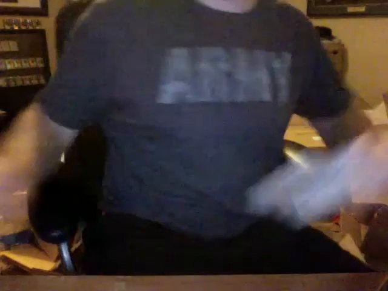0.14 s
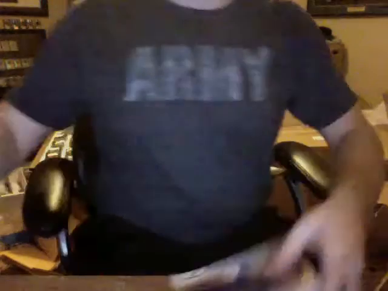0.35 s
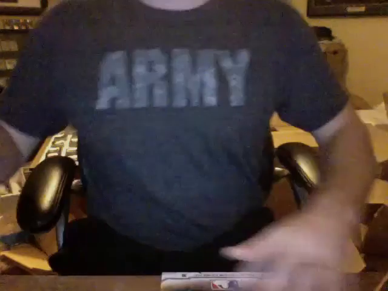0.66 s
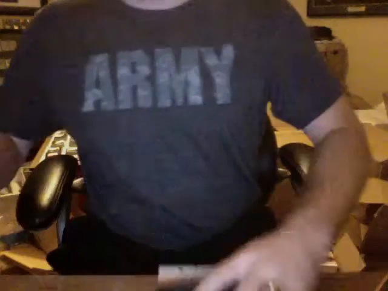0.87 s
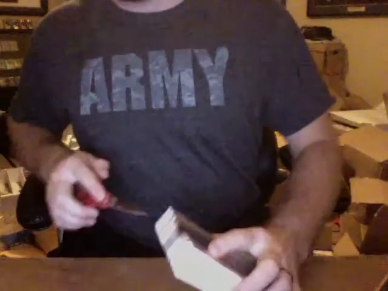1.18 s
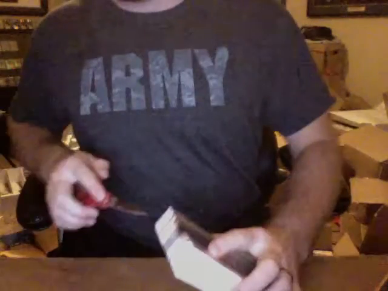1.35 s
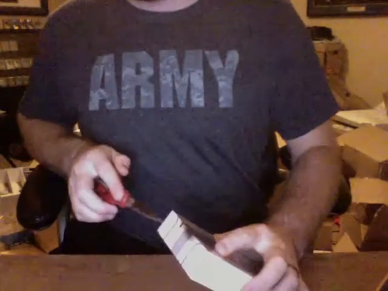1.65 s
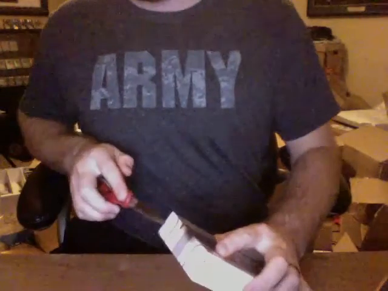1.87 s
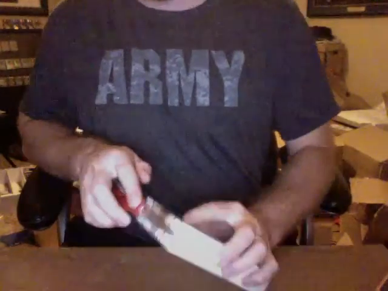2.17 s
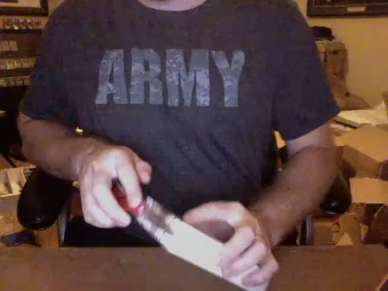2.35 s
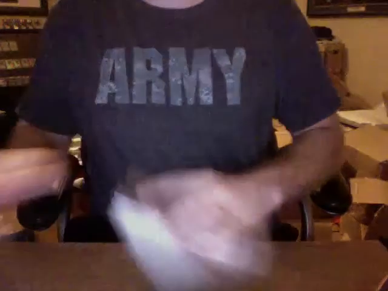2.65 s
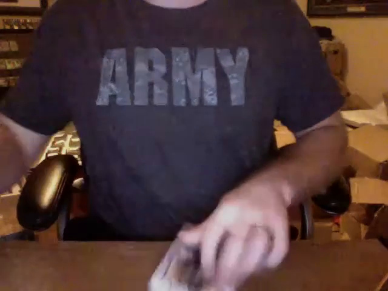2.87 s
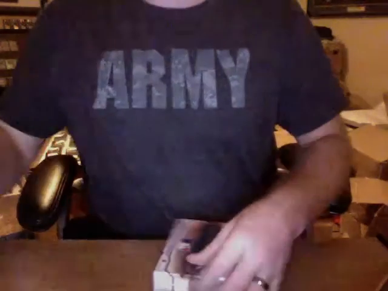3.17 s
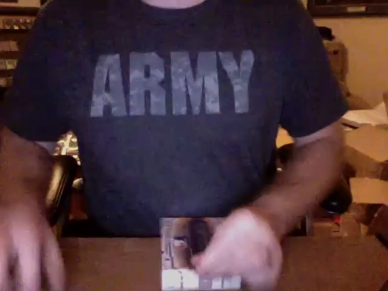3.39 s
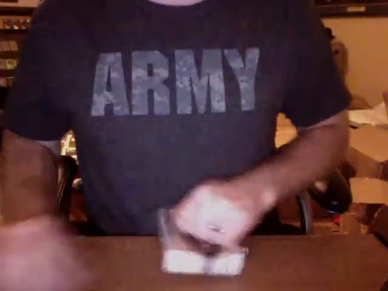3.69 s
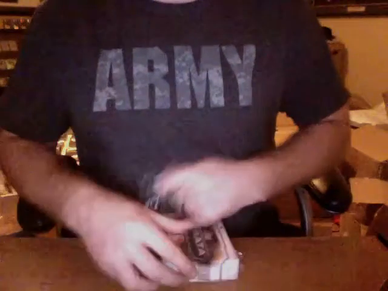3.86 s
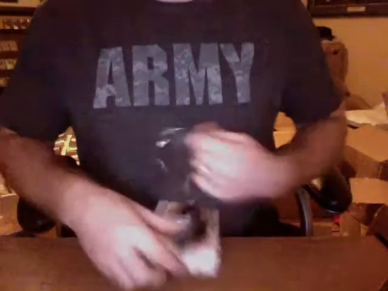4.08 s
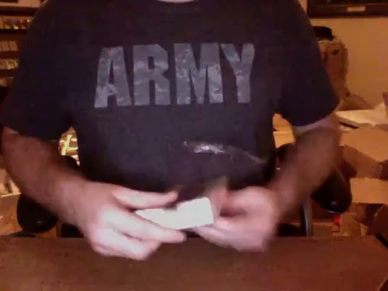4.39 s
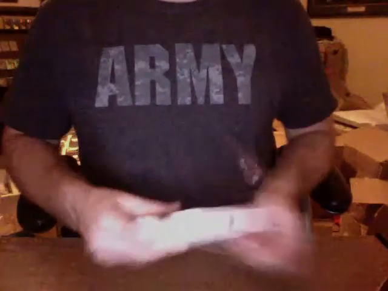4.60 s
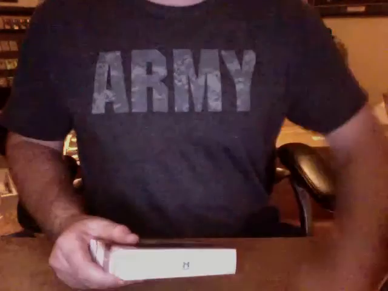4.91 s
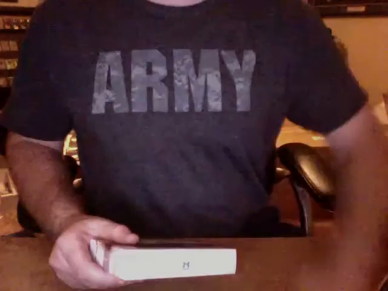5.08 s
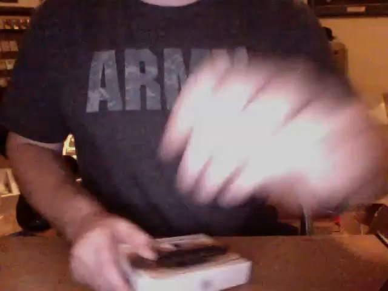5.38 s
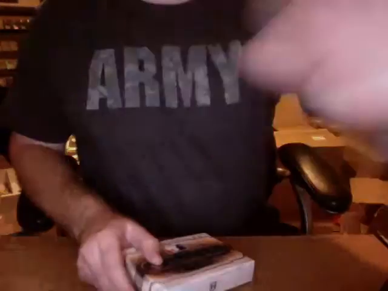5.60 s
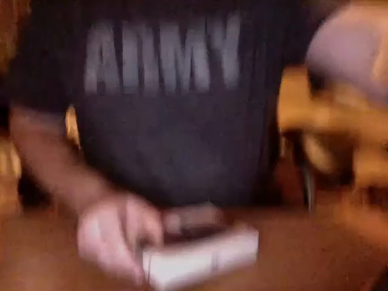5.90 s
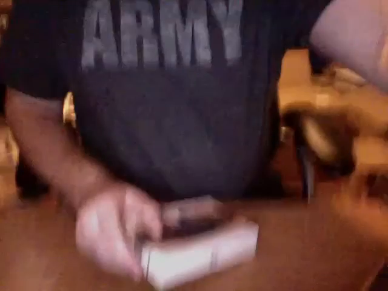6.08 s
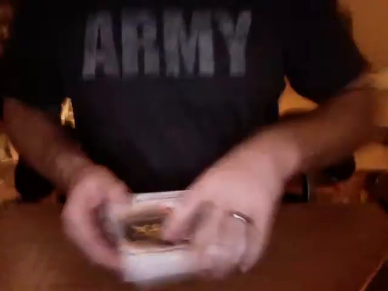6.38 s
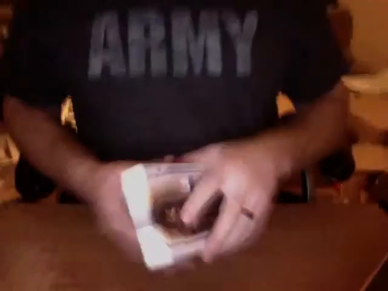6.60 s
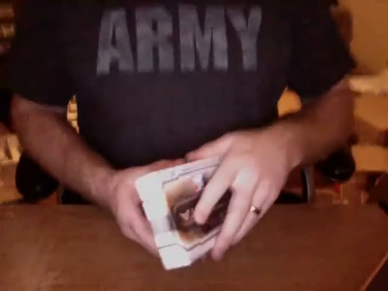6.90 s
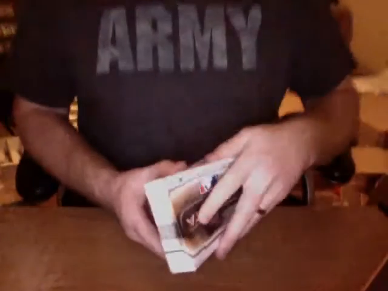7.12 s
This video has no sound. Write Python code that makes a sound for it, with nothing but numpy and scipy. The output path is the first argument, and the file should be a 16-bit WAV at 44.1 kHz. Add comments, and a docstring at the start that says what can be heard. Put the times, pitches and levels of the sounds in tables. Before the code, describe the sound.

A soft computer fan runs throughout. A hollow cardboard clack opens, followed by faint desk bumps and a pause. Around two seconds, film is cut and torn in loud crisp cracks with scraping box, then boxy knocks and another snap. Quieter crinkles and airy ticks follow, then light taps, a click, and a little handling. Dry close sound, short room tail, little deep bass.

```python
"""A small cluttered room, at a desk: a boxed pack is put down, slit with a knife and stripped of its plastic film.
Close to the microphone a computer fan hums: shaped noise and two wavering tones.
On the desk, hands shuffle the box (grains through ringing modes) and the film crinkles and snaps (filtered noise).
Knocks ring the card box and the desk top as dying sines; the room answers with a short tail of sparse taps.
The small microphone loses the deep bass and squeezes the peaks."""
import sys
import numpy as np
from scipy import signal
from scipy.io import wavfile
from scipy.ndimage import uniform_filter1d

SR = 44100
rng = np.random.default_rng(int(sys.argv[2]) if len(sys.argv) > 2 else 0)


def wav_record(signal):
    """Record a signal, one row per channel, as 16-bit PCM in the file named by sys.argv[1]."""
    frames = np.transpose(np.atleast_2d(signal))
    bounded = np.clip(frames, -1, 1)
    # unit amplitude maps onto the largest positive 16-bit level
    quanta = np.round(bounded * 32767).astype(np.int16)
    wavfile.write(sys.argv[1], SR, quanta)


N = 319725


def amp(db):
    """Turns dB into a gain."""
    return 10 ** (np.asarray(db) / 20)


def evened(x):
    """Scales to rms 1."""
    return x / np.sqrt(np.mean(x ** 2) + 1e-20)


def smoothed(x, size):
    """Averages the rows over size[0] steps and the columns over size[1]."""
    return uniform_filter1d(uniform_filter1d(x, size=size[0], axis=0), size=size[1], axis=1)


def read(points, hz):
    """Reads a spectrum on a log-frequency axis."""
    f, value = np.transpose(points)
    return np.interp(np.log(hz + 1), np.log(f + 1), value)


def add(mix, s, sound):
    """Mixes a sound in at s seconds."""
    part = mix[round(s * SR):][:len(sound)]
    part += sound[:len(part)]


def colour(x, points):
    """Filters causally (minimum phase) with the given spectrum, filter energy 1."""
    level_db = np.maximum(read(points, abs(np.fft.fftfreq(1024, 1 / SR))), -80)
    log_gain = np.log(amp(level_db))
    phase = -signal.hilbert(log_gain).imag
    taps = np.fft.ifft(np.exp(log_gain + 1j * phase)).real[:512]
    return signal.oaconvolve(x, taps / np.linalg.norm(taps))[:len(x)]


def rings(modes, weight, contact_s):
    """Dying sines of a struck body, peak 1; a long soft contact makes them swell in."""
    t = np.arange(SR // 4) / SR
    out = np.zeros(len(t))
    for w, (hz, db, t60) in zip(weight, modes):
        out += w * amp(db - 60 * t / t60) * np.sin(2 * np.pi * hz * t)
    out *= np.sin(np.pi / 2 * np.minimum(t / max(contact_s, 1 / SR), 1)) ** 2
    return out / abs(out).max()


def grains(per_s, spread_db):
    """Sparse clicks of random sign, many small and a few large, rms 1."""
    size = amp(spread_db * np.minimum(rng.exponential(1, N), 4)) * rng.choice([-1., 1.], N)
    return evened(size * (rng.random(N) < per_s / SR))


def clumped(x, patchy_db, size):
    """Random patches come forward or fall back as creases bunch up; size = (steps of 172 Hz, steps of 1.5 ms)."""
    _, _, z = signal.stft(x, nperseg=256, noverlap=192)
    patches = evened(smoothed(rng.standard_normal(z.shape), size))
    return evened(signal.istft(z * amp(patchy_db * patches), nperseg=256, noverlap=192)[1][:N])


RISE_DB, FALL_DB = 23.5, 35.5  # dB gained in the rise time and lost in the fall time
ROUND = 1.385  # over 1 rounds the top
LINGER_DB, LINGER = -34, 7.3  # a faint remainder, and how many times slower it falls


def swells(rows, above_db, fall_share):
    """Each row rises to its peak and dies away; returns their summed gain and which row is loudest."""
    peak, rise, fall, db = np.transpose(rows)[:4, :, None]
    t = np.arange(0, N / SR + .01, .001)
    before = np.maximum(peak - t, 0) / np.maximum(rise, .002)
    after = np.maximum(t - peak, 0) / np.maximum(fall * fall_share, .003)
    rising_db = db + np.reshape(above_db, (-1, 1)) - RISE_DB * before ** ROUND
    dying = amp(-FALL_DB * after ** ROUND) + amp(LINGER_DB - FALL_DB * after / LINGER)
    each = amp(rising_db) * dying
    now = np.arange(N) / SR
    gain = np.interp(now, t, np.linalg.norm(each, axis=0))  # the rows add as power
    return gain, each.argmax(axis=0)[(now * 1000).astype(int)]


# how fast the room's echoes die: [f/Hz, t60/s]
ROOM_DECAY = [(100, 0.044), (300, 0.26), (1000, 0.16), (3000, 0.069), (7000, 0.13), (14000, 0.18)]


def room(x):
    """Sparse taps of random sign, one in every 20 samples, each band dying at its own speed."""
    taps, slots = np.zeros(SR // 2), np.arange(200, SR // 2 - 20, 20)
    taps[slots + rng.integers(0, 20, len(slots))] = rng.choice([-1., 1.], len(slots))
    hz, t, z = signal.stft(taps, SR, nperseg=256)
    decay = amp(-60 * t / read(ROOM_DECAY, hz)[:, None])
    tail = signal.istft(z * decay, SR, nperseg=256)[1]
    return signal.fftconvolve(x, tail / np.linalg.norm(tail))[:N]


# spectrum of the fan's rushing air, relative: [f/Hz, level/dB per Hz]
FAN_AIR = [(24, -85.5), (40, -53), (124, -16.5), (297, -14.5), (354, -10), (444, -13), (942, -11),
           (1020, -10.5), (1210, -12), (1760, -13), (1900, -16.5), (3140, -13), (4240, -23), (5870, -25.5),
           (16000, -55.5)]
# thin tones of the fan, before the drift below: [f/Hz, level/dB]
FAN_TONES = [(355, -73), (1141, -72.5)]
# the whole hum drifts and dips briefly: [t/s, level/dB]
FAN_DRIFT = [(0, 1.5), (1.0, 2), (1.3, -2.5), (1.58, -3), (1.62, -1.5), (2.5, 5.5), (5.4, 1.5), (6.2, -1),
             (7.25, 5)]


def fan():
    """Rushing air with drifting patches, and two thin wavering tones, close to the microphone."""
    frames, hz = N // 512 + 5, np.fft.rfftfreq(2048, 1 / SR)
    real, imaginary, patches = rng.standard_normal((frames, 1025, 3)).T
    patches = evened(smoothed(patches, (20, 8)))
    z = (real + 1j * imaginary) * amp(read(FAN_AIR, hz)[:, None] + 0.8 * patches)
    air = evened(signal.istft(z, nperseg=2048, noverlap=1536)[1][:N])
    hum = amp(-59.5) * air
    for f, db in FAN_TONES:
        waver = uniform_filter1d(rng.standard_normal(N), size=4000)
        waver = evened(uniform_filter1d(waver, size=4000))
        phase = 2 * np.pi * np.cumsum(f + 1.1 * waver) / SR
        hum += np.sqrt(2) * amp(db + 1.3 * waver) * np.sin(phase)
    return hum * amp(np.interp(np.arange(N) / SR, *np.transpose(FAN_DRIFT)))


# ringing modes of the card box: [f/Hz, level/dB, t60/s]
BOX_MODES = [(282, -8.5, 0.02), (344.6, -7, 0.13), (399.4, 1, 0.037), (547, 2.5, 0.033), (588, -2.5, 0.073),
             (712, 1.5, 0.041), (798.5, 1, 0.043), (872, 2.5, 0.032), (1074, 4, 0.024), (1177, -13.5, 0.11),
             (1304, 2, 0.044), (1592, 1, 0.026), (2020, -14, 0.066), (2350, -1.5, .03)]


def favoured(hz, spread):
    """The spot touched favours the box modes within spread octaves of its pitch: a weight for each mode."""
    weights = []
    for mode_hz, _, _ in BOX_MODES:
        octaves = np.log2(mode_hz / hz)
        weights.append(np.exp(-.5 * (octaves / max(spread, .05)) ** 2) + 0.027)
    return weights


# ringing modes of the desk top: [f/Hz, level/dB, t60/s]
DESK_MODES = [(114.1, -6.5, 0.22), (134.6, -7, 0.14), (157, -6.5, 0.077), (208.7, 2, 0.13), (233, -3, 0.14)]
# box and arms shuffled on the desk, a row a move, before the trims and fall shares in shuffle():
# [peak t/s, rise t/s, fall t/s, box level/dB, desk rumble/dB above it, rubbed spot f/Hz]
MOVES = [(.14, 0.032, .12, -23.5, -12, 537), (.22, 0.033, 0.17, -31.5, -12, 545),
         (.3, .1, 0.12, -38.5, -13, 423), (.46, 0.012, 0.46, -45, 6, 373), (.63, .05, 0.71, -51.5, 2, 345),
         (.92, .04, 0.3, -71, 14, 370), (1.786, 0.076, 0.1, -39.5, -33, 470), (1.93, .1, .1, -36, -18, 496),
         (1.99, 0.045, 0.22, -22.5, -17, 530), (2.23, 0.065, 0.24, -31.5, -32, 585),
         (2.336, .1, 0.11, -29, -24, 568), (2.574, 0.017, 0.095, -26.5, -23, 530),
         (2.839, 0.018, 0.17, -17, -6, 830), (2.91, 0.073, .15, -27.5, -5.5, 405),
         (2.974, .02, 0.14, -27.5, -1, 746), (3.3, 0.19, 0.95, -50, -7.5, 880),
         (3.5, .05, 0.044, -53, -17, 790), (3.546, 0.018, .13, -25, -5, 880),
         (3.95, 0.47, 0.26, -53.5, -17, 940), (4.06, 0.019, 0.088, -32.5, -10, 620),
         (4.15, .06, .06, -43, -18, 750), (4.322, 0.12, 0.16, -39, -18, 1210),
         (4.66, 0.026, 0.078, -39, 7.5, 372), (4.965, 0.094, 0.07, -54, 10, 342),
         (5.285, .04, 0.043, -44, -20.5, 796), (6.08, 0.18, 0.065, -51.5, -12, 560),
         (6.275, .02, .4, -41.5, -9, 563), (6.41, 0.093, .12, -41, 1, 400),
         (6.764, 0.19, 0.55, -50.5, -5.5, 650), (7.108, .02, 0.07, -31.5, -17, 912)]


def shuffle():
    """Uneven little slips and bumps keep box and desk ringing."""
    *_, rumble_db, spot_hz = np.transpose(MOVES)
    rub, loudest = swells(MOVES, 0, fall_share=0.99)
    rumble, _ = swells(MOVES, rumble_db, fall_share=1)
    pitch = uniform_filter1d(spot_hz[loudest], size=400)  # glides from move to move
    slips = grains(per_s=330, spread_db=4.0)
    box, power = np.zeros(N), np.zeros(N)
    for weight, mode in zip(favoured(pitch, 0.56), BOX_MODES):
        gain = weight * amp(mode[1])
        ringing = signal.oaconvolve(slips, rings([mode], [1], contact_s=0.00079))[:N]
        box += gain * evened(ringing)
        power += gain ** 2
    box /= np.sqrt(power)
    thump = rings(DESK_MODES, np.ones(len(DESK_MODES)), contact_s=0.0016)
    desk = evened(signal.oaconvolve(grains(per_s=230, spread_db=1.5), thump)[:N])
    return amp(-4) * rub * box + amp(-6.0) * rumble * desk


# spectra of the film's dull, middle and airy parts, one list each: [f/Hz, level/dB]
FILM_PARTS = [(800, -7.5), (1400, 1.5), (2500, -0.5), (3500, -3), (5200, -41)], [(2600, -39), (4300, 8),
              (6000, 4), (7500, -2), (9000, -8.5), (11000, -45)], [(7500, -31.5), (9500, -1.5), (12000, -4),
              (16000, -10), (18000, -19)]
# film pulled and crumpled, a row a handful, before the trim and fall shares in crinkle():
# [peak t/s, rise t/s, fall t/s, middle level/dB, dull part/dB above it, airy part/dB above it]
HANDFULS = [(0.117, 0.0062, 0.23, -35.5, 16, -20), (0.186, .005, 0.087, -43.5, 17, -27),
            (.512, 0.0093, 0.093, -71.5, 25, -18), (1.82, 0.11, 0.6, -61.5, 7.5, -4),
            (1.98, 0.017, 0.26, -40, 9, -9), (2.085, 0.034, .17, -45, -15, -2),
            (2.186, 0.051, 0.055, -45, -16, 2.5), (2.201, 0.017, 0.17, -26, -8.5, -15),
            (2.262, 0.035, 0.13, -34, -0.5, -14), (2.308, .1, 0.068, -34.5, -3, -6),
            (2.334, 0.0053, 0.15, -25.5, -3.5, -14), (2.555, 0.011, 0.12, -48.5, 22, -4),
            (2.785, 0.024, 0.13, -65.5, 16.5, 3), (2.85, 0.026, 0.15, -30.5, 10, -20),
            (2.967, .006, 0.13, -56, 23, -34), (3.1, 0.088, 0.27, -71, 9, 3),
            (3.285, 0.083, 0.81, -59.5, -1, -6), (3.466, 0.034, 0.2, -31.5, -0.5, -8),
            (3.54, .008, 0.16, -27.5, 3.5, -6.5), (3.721, .008, 0.13, -46.5, -0.5, 0),
            (3.76, 0.055, 0.11, -37.5, -5, -9), (3.842, 0.047, 0.23, -54, 3, -3),
            (4.061, 0.054, 0.13, -52, 8.5, 2.5), (4.14, 0.035, .13, -40.5, -3.5, -2),
            (4.294, 0.065, 0.11, -48, 0, -5), (4.322, 0.045, 0.17, -39, 4, -1.5),
            (4.375, 0.12, .1, -36.5, -2.5, -10), (4.52, 0.066, 0.096, -48, -3.5, -6),
            (4.575, .01, .15, -49, -1, -4), (4.64, 0.027, 0.14, -38.5, 3, -9),
            (4.84, 0.3, 0.42, -58.5, 6, -11.5), (5.896, 0.042, .08, -70, -6, -2.5),
            (6.268, 0.023, 0.099, -41.5, 7, -8), (6.445, 0.086, 0.14, -64, 14, -12),
            (6.72, .15, 0.15, -61, 10.5, -14.5), (6.765, 0.027, 0.065, -53, 8.5, -9),
            (6.789, 0.056, 0.18, -44, 5, -12), (6.992, 0.015, 0.24, -59, 9.5, -12),
            (7.093, 0.021, 0.15, -38.5, 7.5, -11.5)]


def crinkle():
    """Thousands of tiny creases a second over the hiss of sliding film; the smallest are sparse and airy."""
    *_, dull_db, airy_db = np.transpose(HANDFULS)
    dull, _ = swells(HANDFULS, dull_db, fall_share=0.85)
    middle, _ = swells(HANDFULS, 0, fall_share=0.86)
    airy, _ = swells(HANDFULS, airy_db, fall_share=.75)
    buckles = 1.2 * grains(per_s=2000, spread_db=3)
    creases = clumped(buckles + rng.standard_normal(N), patchy_db=3.0, size=(8, 6))
    pricks = 0.7 * grains(per_s=1500, spread_db=3.0)
    pricks = clumped(pricks + rng.standard_normal(N), patchy_db=4.0, size=(24, 3))
    film = dull * colour(creases, FILM_PARTS[0])
    film += middle * colour(creases, FILM_PARTS[1])
    film += airy * colour(pricks, FILM_PARTS[2])
    return amp(-1.0) * film


# snaps of the film and ticks of the blade:
# [t/s, middle level/dB, dull part/dB above it, airy part/dB above it]
CRACKS = [(0.1097, -15, 11, -13.5), (0.177, -21, 6, -12), (0.2, -44, 16.5, -22), (1.8106, -50, -3, 5),
          (1.8253, -50.5, 20.5, -19), (1.9729, -34, 14.5, -8), (2.0744, -43, -1, -3),
          (2.1252, -39, -9.5, -1), (2.15, -32, -30.5, 0), (2.165, -31, -20, -3), (2.174, -30, -21, -18),
          (2.181, -28, -14, -4), (2.193, -5, -6.5, -17), (2.2587, -25, 9, 2), (2.3209, -6, -5, -10),
          (2.3252, -16, -2, -9), (2.5495, -23, 10, -13), (2.7502, -42.5, 14, -38), (2.7738, -55, 22, -11),
          (2.822, -12, 5.5, -21), (2.844, -13, 4.5, -18), (2.9611, -31, 15, -49), (3.2861, -36, -4, -10),
          (3.328, -52, 18.5, -2), (3.4357, -29.5, 8.5, 3), (3.4535, -31.5, 16.5, 8), (3.461, -20, 8, 4),
          (3.5313, -14, 7, -6.5), (3.5574, -22, -14, -4), (3.712, -37, -4, 16), (3.7626, -31, 3, -9),
          (3.786, -37, -20, 13), (3.809, -38.5, -14.5, 10), (3.845, -36, 6, 4), (4.0087, -44, 6, -13),
          (4.0516, -43, 19, -2), (4.109, -43, -12, 16), (4.214, -45, -20, 10), (4.3216, -35, 10, -2),
          (4.379, -33, 0, -1), (4.4943, -37, 0, -15), (4.5106, -36.5, -5, 7), (4.5227, -40, -19, 7),
          (4.6334, -32, 8, -3), (5.7233, -20.5, -12, -9), (6.244, -32.5, -7, -19),
          (6.2534, -39.5, 15.5, -24), (6.402, -57.5, 22.5, -25), (6.764, -36, 8, -7),
          (6.784, -22, 6.5, -11), (6.8097, -28.5, -22, -9), (6.991, -46, 6, 0), (7.086, -35, 15, -29),
          (7.1322, -25, 3, -23)]


def snaps():
    """A crease buckles: a wide burst of a few milliseconds, longer when loud."""
    out, ms = np.zeros(N), np.arange(900) / SR * 1000
    noises = rng.standard_normal((len(CRACKS), len(ms)))
    for (s, db, dull_db, airy_db), noise in zip(CRACKS, noises):
        length_ms = 2.1 + 4.0 * np.sqrt(amp(db))
        burst = noise * (1 - np.exp(-ms / 0.052)) * np.exp(-ms / length_ms)
        burst *= 1 + 1.1 * np.exp(-ms / 0.31)  # the first crack stands out
        for part, above_db in zip(FILM_PARTS, (dull_db, 0, airy_db)):
            click = colour(burst, part)
            add(out, s, amp(db + above_db) * click / abs(click).max())
    return out


# knocks of box, knife and hand: [t/s, blow level/dB, main pitch f/Hz, desk thump/dB above the blow]
BLOWS = [(0.11, -3, 540, -15), (0.117, -10, 525, -32), (0.176, -3, 540, -42), (0.199, -12.5, 560, -12.5),
         (0.46, -49, 313, -17), (0.519, -30, 304, -9), (0.642, -34, 283, -33), (0.679, -38.5, 363, 5),
         (0.899, -29, 495, -2.5), (1.161, -53.5, 333, -2), (1.603, -50, 680, -3.5), (1.785, -37, 387, -28),
         (1.82, -35, 850, -13), (1.893, -35.5, 363, -23), (1.934, -28.5, 530, -33),
         (1.975, -18.5, 498, -10), (2.192, -15, 680, -43), (2.258, -15, 544, -31), (2.321, -10.5, 560, -20),
         (2.549, -8, 1160, -18), (2.557, -7, 538, -41), (2.794, -28, 338, 0.5), (2.822, -13.5, 980, -37),
         (2.832, -11, 805, -25), (2.847, -17, 960, -19), (2.878, -16, 674, -10), (2.963, -22.5, 1200, -5),
         (3.013, -35, 244, 7), (3.454, -19.5, 830, -41), (3.461, -18, 880, -29), (3.529, -9.5, 1030, -18),
         (3.555, -31, 1250, -2), (4.046, -24.5, 645, -28), (4.057, -23.5, 527, -11), (4.641, -30, 269, 6.5),
         (4.648, -27.5, 338, 2), (4.848, -44.5, 315, 0), (4.951, -36.5, 240, 5.5), (5.093, -39, 860, -39),
         (5.115, -34, 796, -55), (5.18, -33, 800, -29.5), (5.304, -26, 549, -18.5), (5.309, -26, 1120, -29),
         (5.346, -26.5, 808, -37.5), (5.668, -64, 280, 15), (6.244, -20, 883, -13.5),
         (6.253, -13.5, 650, -15), (6.343, -20, 494, -10.5), (6.438, -28, 700, -10),
         (6.441, -39.5, 2200, -30), (6.786, -24.5, 560, -47.5), (6.993, -53, 1270, -35),
         (7.088, -24, 390, -21)]
# octaves of box modes that a blow wakes: a gentle one, and what a full one adds
SOFT_SPREAD, HARD_SPREAD = 0.32, 0.26


def knocks():
    """Each blow rings the box modes near its pitch and thumps the desk."""
    out, chance = np.zeros(N), rng.uniform(0.23, 1, (len(BLOWS), len(BOX_MODES)))
    for (s, db, hz, thump_db), luck in zip(BLOWS, chance):
        contact_s = 0.0013 / amp(db) ** 0.27  # gentle blows land on a soft pad and stay longer
        spread = SOFT_SPREAD + HARD_SPREAD * np.sqrt(amp(db))
        box = rings(BOX_MODES, favoured(hz, spread) * luck, contact_s)
        add(out, s, amp(db) * box)
        add(out, s, amp(db + thump_db) * rings(DESK_MODES, luck, contact_s=0.0029))
    return out


def scene():
    """Hands, box and film with their room, over the fan."""
    turn = np.pi * np.arange(N) / SR / .37  # the hands shift about, so the echoes keep changing
    hum, rubs, cracks, blows = fan(), shuffle() + crinkle(), snaps(), knocks()
    wet = amp(-10.0) * blows + amp(-11.0) * cracks + amp(-7) * rubs
    echoes = room(wet * np.cos(turn)) + room(wet * np.sin(turn))  # two independent tails
    return (blows + cracks + rubs + echoes + hum)[None]


def record(dry):
    """A small microphone, deaf to deep bass, that squeezes the loudest peaks; then the band limit."""
    thin = signal.sosfilt(signal.butter(4, 105, "high", fs=SR, output="sos"), dry)
    squeezed = .85 * np.tanh(thin / .85)
    band = signal.firwin(511, 15900, window=("kaiser", 9), fs=SR)  # upper edge in Hz
    return signal.oaconvolve(squeezed, band[None], "same")


dry = scene()
out = record(dry)
wav_record(out)
```